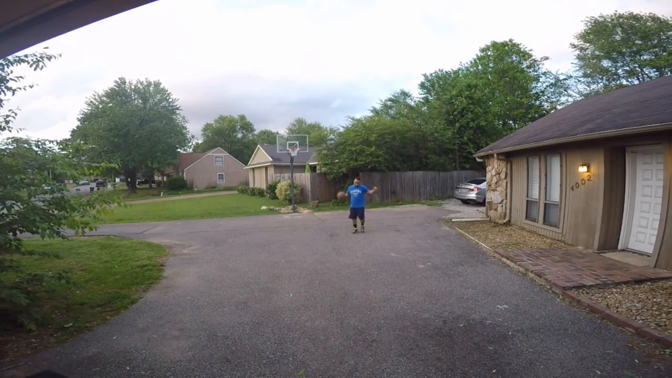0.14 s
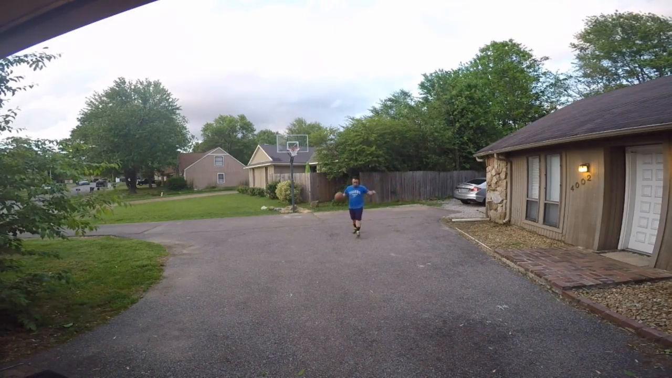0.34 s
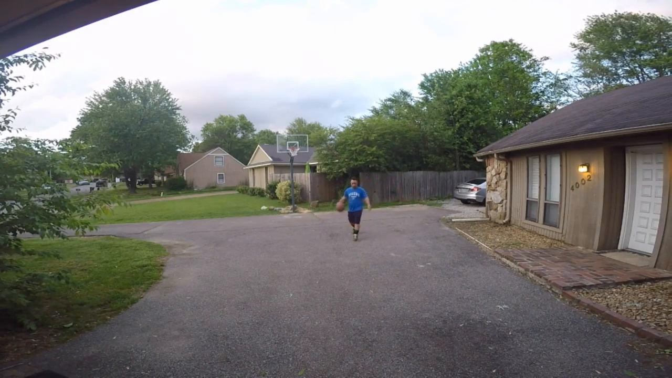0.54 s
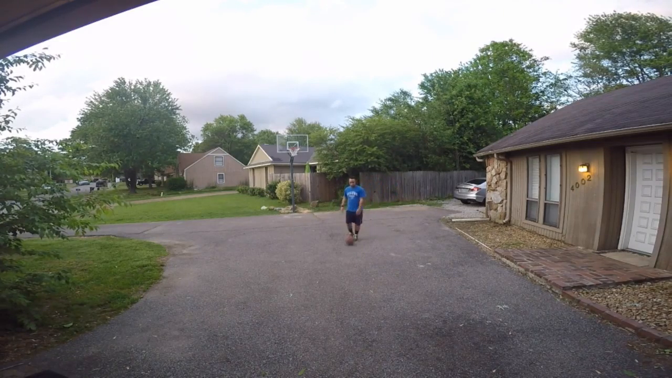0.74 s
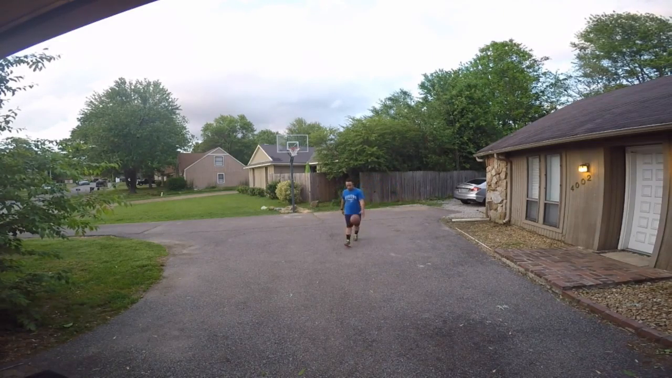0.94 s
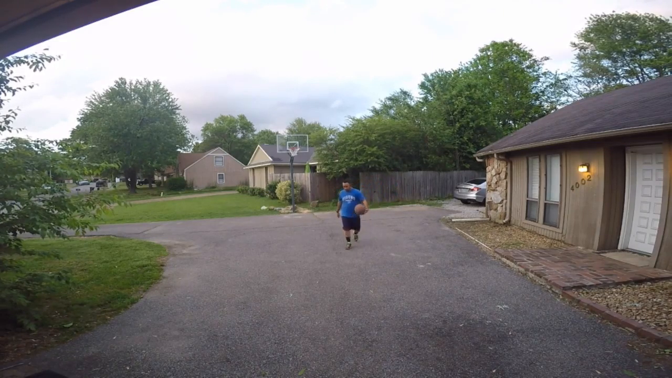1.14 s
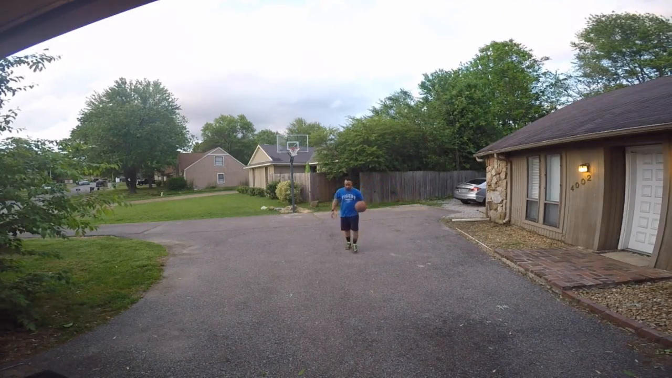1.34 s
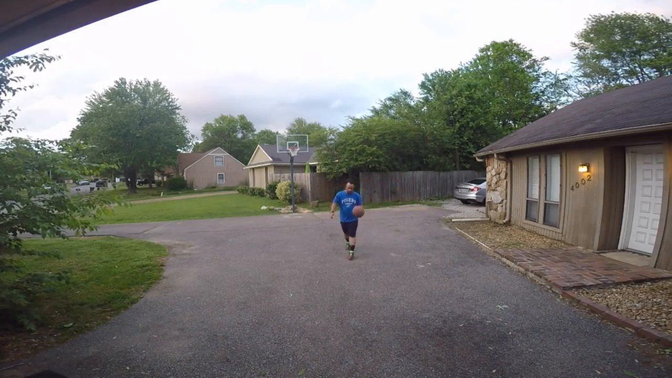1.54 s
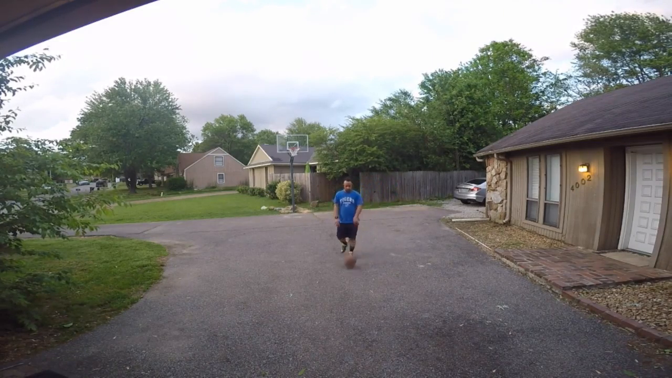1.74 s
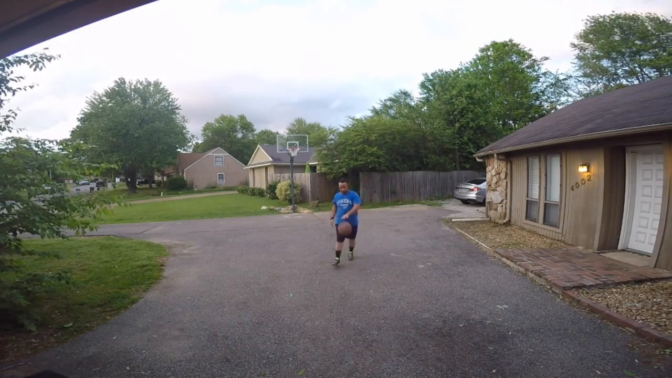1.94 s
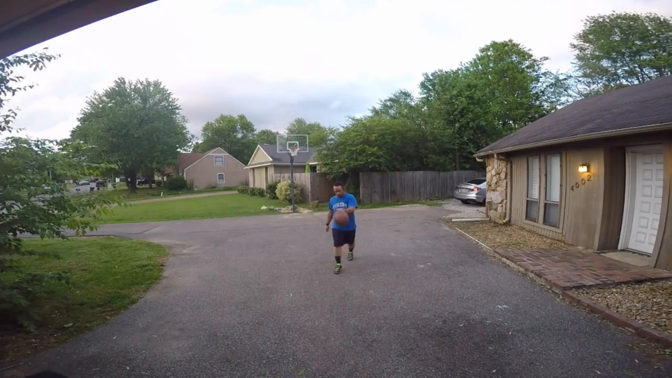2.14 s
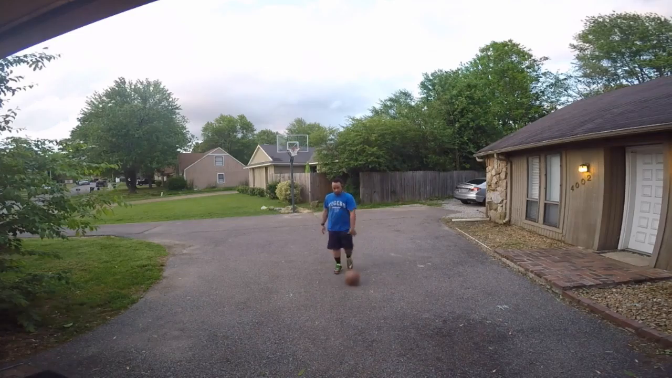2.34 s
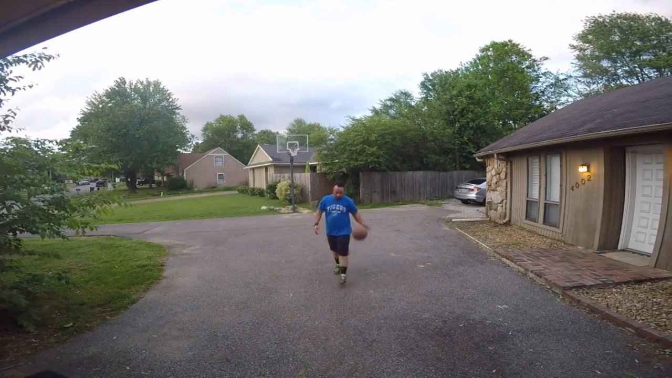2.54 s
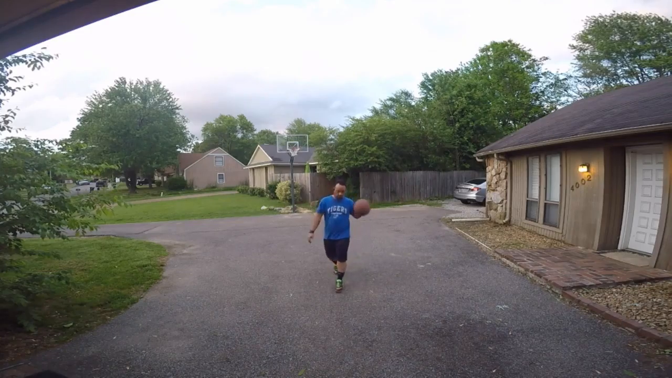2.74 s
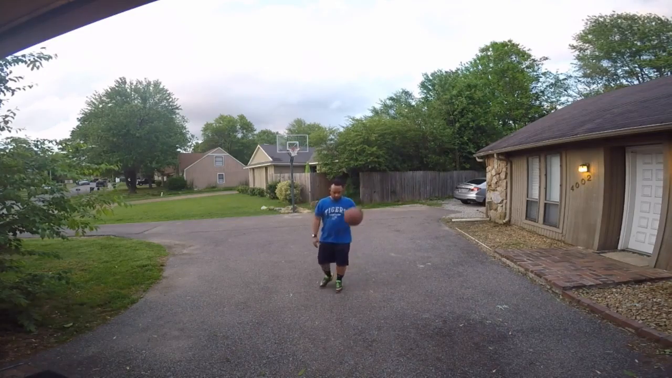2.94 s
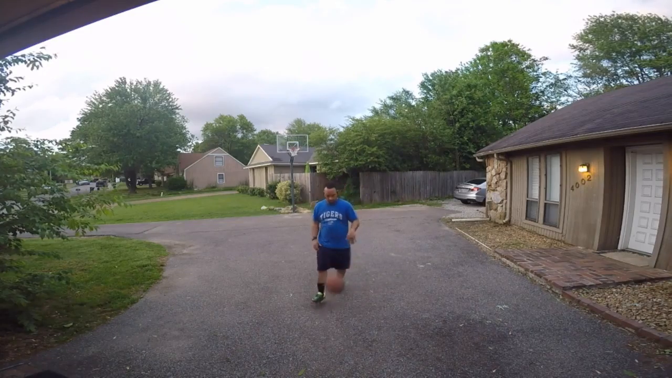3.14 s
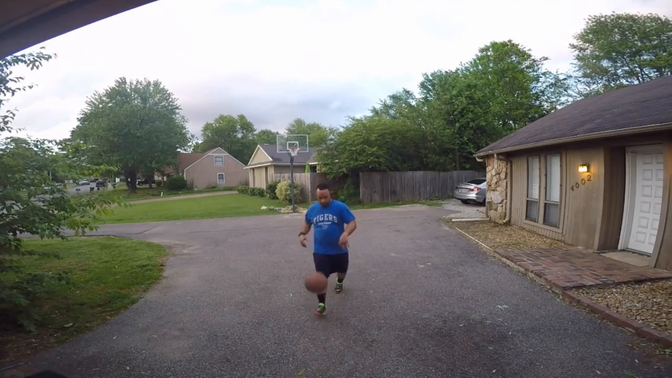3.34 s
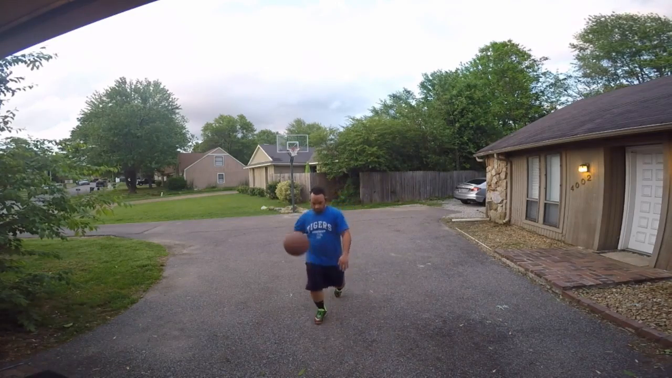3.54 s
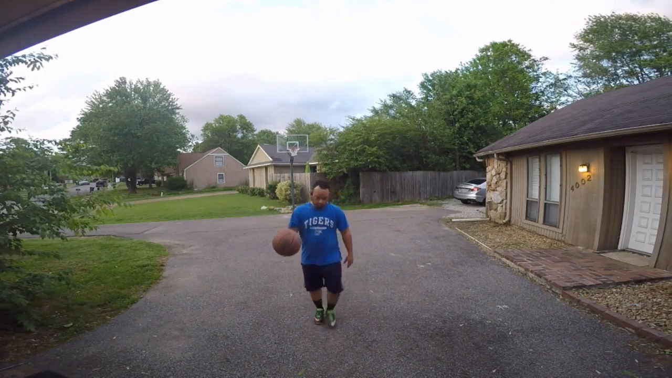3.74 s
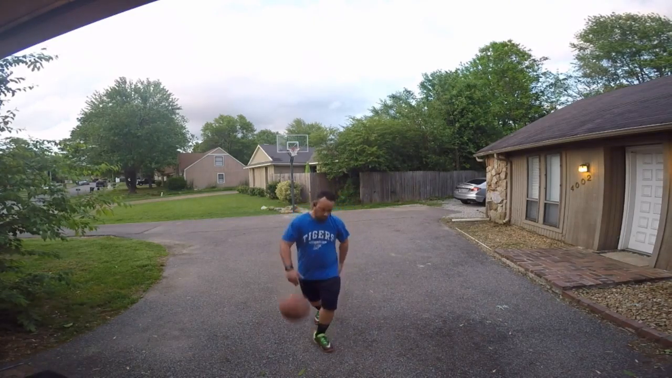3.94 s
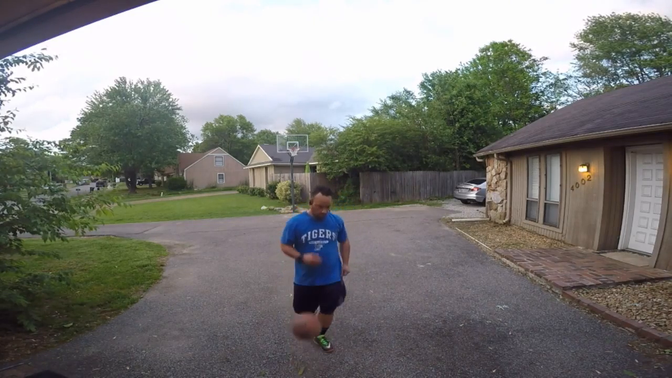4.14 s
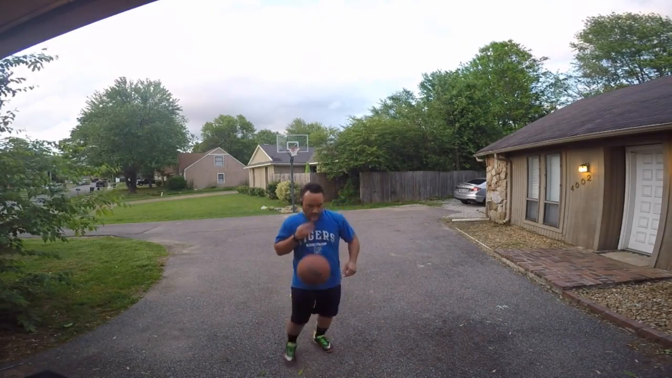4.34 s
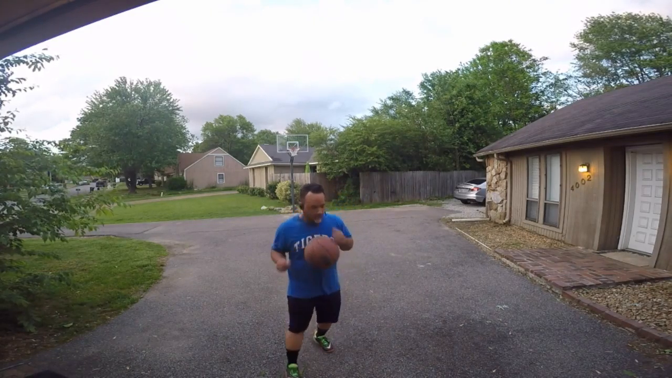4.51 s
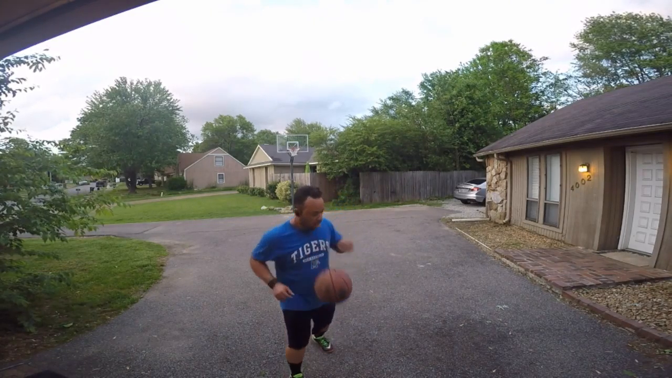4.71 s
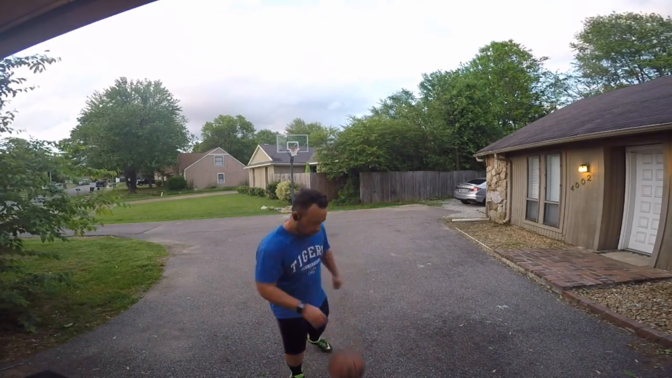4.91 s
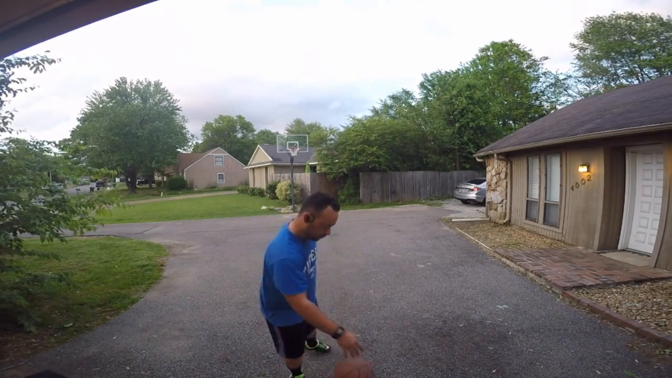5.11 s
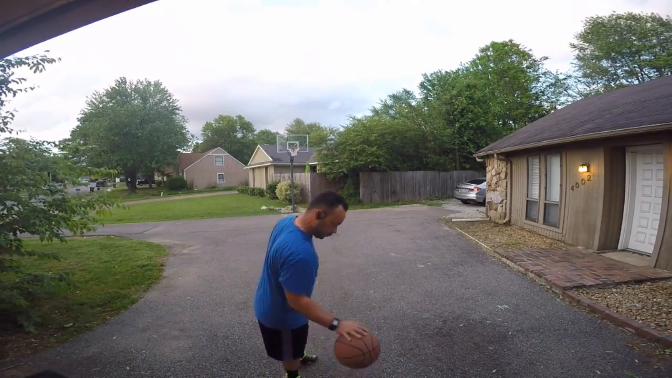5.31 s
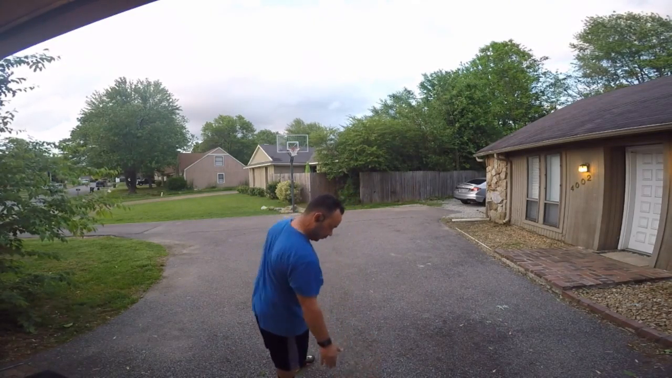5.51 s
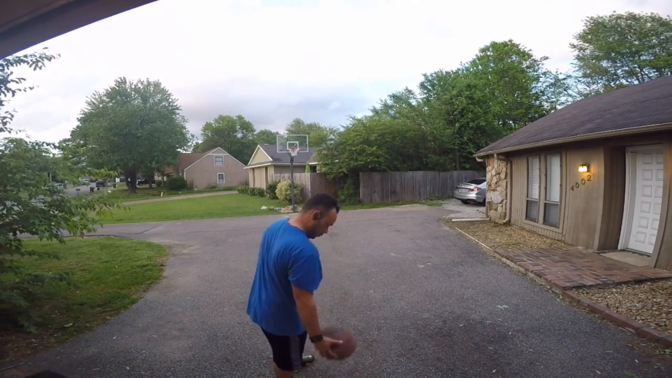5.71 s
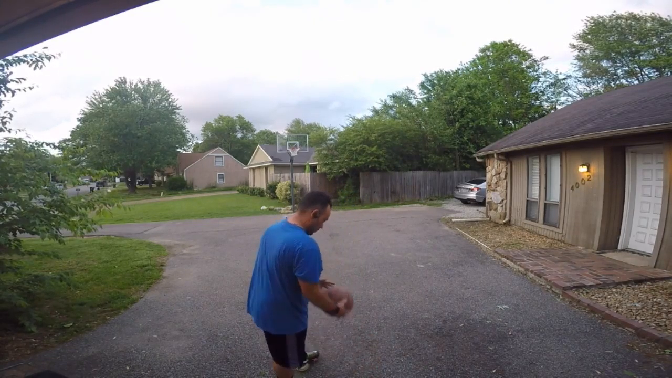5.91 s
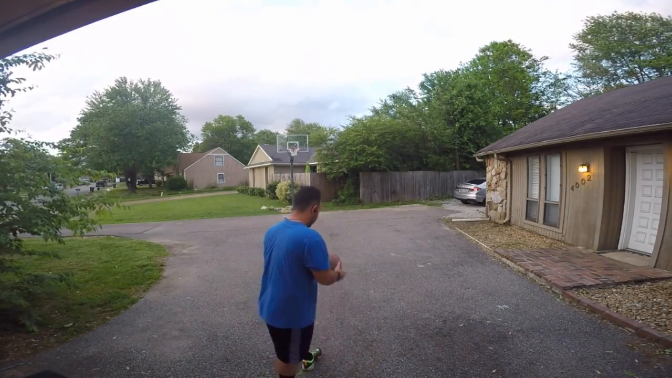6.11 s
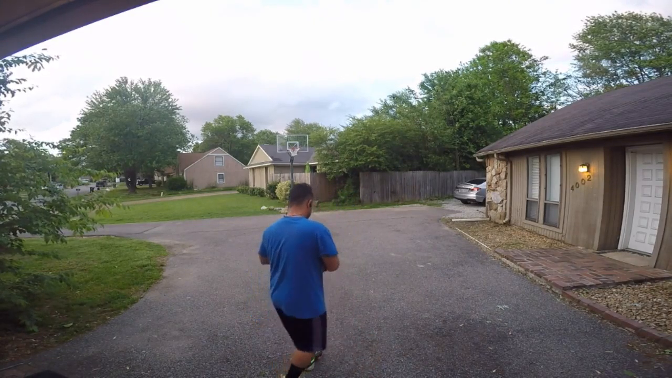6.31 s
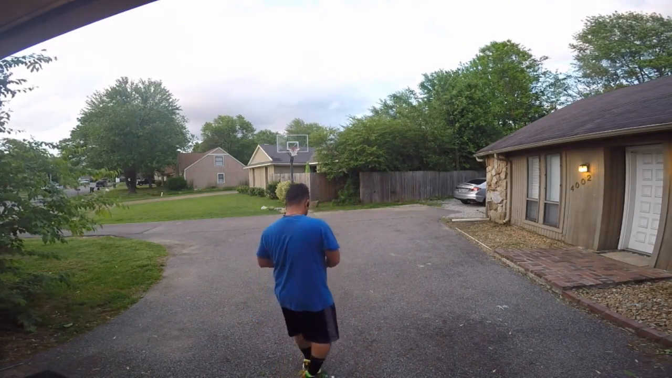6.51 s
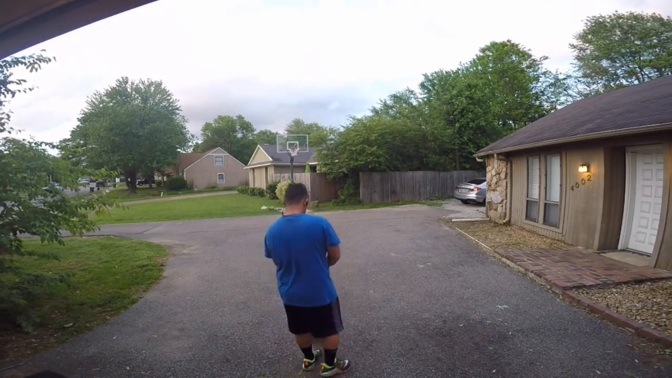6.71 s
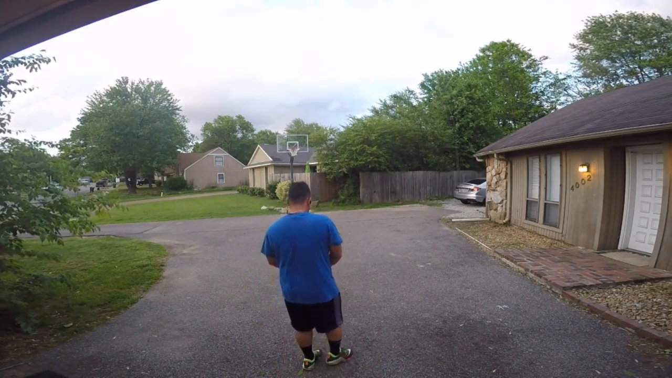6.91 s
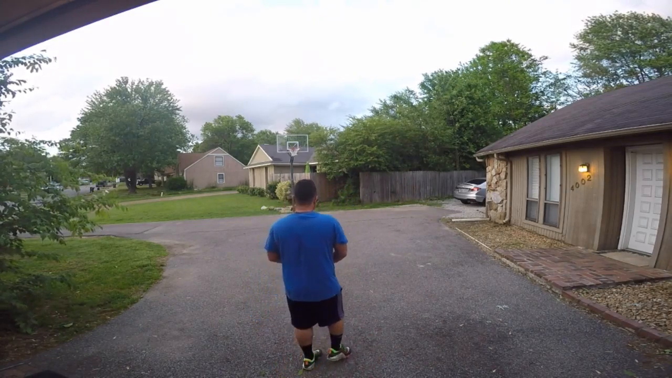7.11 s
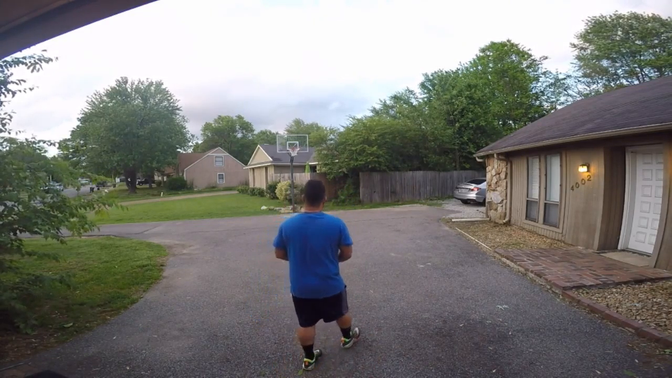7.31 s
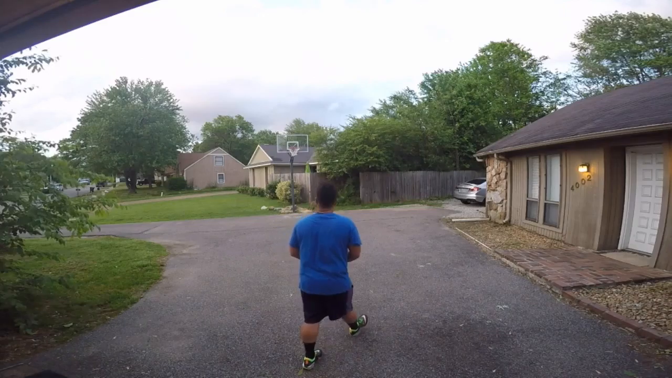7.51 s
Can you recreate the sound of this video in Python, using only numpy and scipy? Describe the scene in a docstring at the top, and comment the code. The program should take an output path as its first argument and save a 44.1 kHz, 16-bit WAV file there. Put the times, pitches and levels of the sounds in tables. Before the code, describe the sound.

Eight spaced basketball bounces on asphalt near a house, each a low thump, bright slap and faint ping, amid light footsteps and outdoor hush.

```python
"""A basketball bounces on an asphalt driveway; it comes nearer to a listener under the eaves, then backs off a little.
Each bounce is a low thump, a bright slap of the skin, a crunch of grit and a faint ping of the air inside.
Walls and yard scatter the sound, and the space under the roof booms.
Hands and shoes tap and scuff, made of short bursts and drags of gritty noise.
Behind them lie a hush of shaped noise, a far bird's gliding whistles and a faint, pulsing chirring."""
import sys
import numpy as np
from scipy import signal
from scipy.fft import rfft, irfft, next_fast_len
from scipy.io import wavfile

SR = 44100
rng = np.random.default_rng(int(sys.argv[2]) if len(sys.argv) > 2 else 0)


def wav_record(signal):
    """Record a signal, one row per channel, as 16-bit PCM in the file named by sys.argv[1]."""
    frames = np.transpose(np.atleast_2d(signal))
    bounded = np.clip(frames, -1, 1)
    # unit amplitude maps onto the largest positive 16-bit level
    quanta = np.round(bounded * 32767).astype(np.int16)
    wavfile.write(sys.argv[1], SR, quanta)


N = 337806
TIME = np.arange(N) / SR
AGE = TIME[:SR]   # one second of time since a sound began

# colour of sand and small stones, for taps and scuffs: (frequency [Hz], relative level per Hz [dB])
GRIT_COLOUR = [(200, -26), (450, -12.5), (800, -8.5), (1200, -7.5), (1380, -13.5), (1600, 5), (2200, -7),
               (2650, 0.5), (3250, -8.5), (3750, 2.5), (4100, 1), (4500, -13.5), (5500, -23), (8500, -19),
               (14000, -43)]


def from_db(db):
    """Turn decibels into a factor for the sound pressure."""
    return 10 ** (np.asarray(db) / 20)


def rms_one(x):
    """Scale a sound to an average strength (rms) of 1."""
    return x / np.sqrt(np.mean(x ** 2) + 1e-20)


def at_level(x, db):
    """Give a blow the same energy as 30 ms of steady sound at this level."""
    return x * from_db(db) * np.sqrt(0.03 * SR / (np.sum(x ** 2) + 1e-20))


def add(track, s, sound):
    """Mix a sound into the track at time s, cutting off what runs past the end."""
    start = max(round(s * SR), 0)
    track[start:start + len(sound)] += sound[:N - start]


def band(x, low_hz, high_hz, order=2):
    """Keep only the frequencies between two limits."""
    sos = signal.butter(order, [low_hz, high_hz], "band", fs=SR, output="sos")
    return signal.sosfilt(sos, x)


def coloured(x, spectrum):
    """Weight the frequencies of a sound by a spectrum, then scale it to rms 1."""
    hz, db = np.transpose(spectrum)
    size = next_fast_len(len(x))
    bins = np.maximum(np.fft.rfftfreq(size, 1 / SR), 1)
    gain = from_db(np.interp(np.log(bins), np.log(hz), db))
    return rms_one(irfft(rfft(x, size) * gain, size)[:len(x)])


def fade(t60, delay=0):
    """Start after a delay, then die away by 60 dB in t60 seconds."""
    return (AGE >= delay) * np.exp(-np.log(1000) * np.maximum(AGE - delay, 0) / t60)


def mode(hz, t60, delay=0):
    """One way a struck thing rings: a dying sine."""
    return np.sin(2 * np.pi * hz * (AGE - delay)) * fade(t60, delay)


def resonate(x, hz, width):
    """Favour the frequencies around one pitch, which itself passes at gain 1."""
    r = np.exp(-np.pi * width / SR)
    feed = np.array([1, 0, -1]) * (1 - r * r) / 2
    feedback = [1, -2 * r * np.cos(2 * np.pi * hz / SR), r * r]
    return signal.lfilter(feed, feedback, x + 1e-18)


def flicker(per_s, db, size):
    """A gain that glides between random values, so many of them a second."""
    return from_db(db * np.interp(TIME[:size] * per_s, np.arange(SR), rng.standard_normal(SR)))


def near_walls(t60):
    """Echo pattern of the eaves and house front: separate reflections, dying fast; energy 1."""
    hits = rng.random(SR) < 2500 / SR   # about 2500 reflections a second
    echoes = rng.standard_normal(SR) * hits * fade(t60, delay=0.0056)
    return echoes / np.linalg.norm(echoes)


def yard(fence_s=0.07, fence_share=0.29, lumps_per_s=70, lumps_db=2):
    """Echo pattern of trees, houses and the far fence: a lumpy tail plus one soft echo."""
    # how long the yard rings: (frequency [Hz], time to fall by 60 dB [s])
    ring_times = [(100, 1), (300, 0.66), (900, 0.87), (1700, 0.84), (3500, 0.7), (6000, 1), (12000, 0.45)]
    hz, t60 = np.transpose(ring_times)
    edges = np.geomspace(80, 16000, 8)
    tail = np.zeros(SR)
    for low, high in zip(edges, edges[1:]):
        band_t60 = np.interp(np.log(low * high) / 2, np.log(hz), t60)
        tail += band(rng.standard_normal(SR), low, high) * fade(band_t60, delay=0.012)
    tail = tail * flicker(lumps_per_s, lumps_db, size=SR)
    fence = rng.standard_normal(SR) * fade(t60=0.13, delay=fence_s)
    tail_part = np.sqrt(1 - fence_share) * tail / np.linalg.norm(tail)
    return tail_part + np.sqrt(fence_share) * fence / np.linalg.norm(fence)


def reflections(sound, near_db, yard_db):
    """What the near walls and the yard send back, each with its own share."""
    response = from_db(near_db) * near_walls(t60=0.12) + from_db(yard_db) * yard()
    return signal.fftconvolve(sound, response)[:len(sound)]


def outdoors(sound, near_db, yard_db):
    """A direct sound together with its reflections."""
    return sound + reflections(sound, near_db, yard_db)


def hush():
    """Steady noise shaped like distant trees, traffic and hiss, with narrow, faint whines."""
    # colour of the hush: (frequency [Hz], relative level per Hz [dB])
    hush_colour = [(10, -92.5), (30, -76), (60, -78.5), (100, -87), (220, -94.5), (650, -102), (1330, -105),
                   (1600, -98), (1950, -103), (4300, -104), (6300, -108.5), (7500, -112), (14300, -114),
                   (15300, -120)]
    # whines in the hiss: (frequency [Hz], width [Hz], level [dB])
    whine_bands = [(4740, 110, -90.5), (9530, 220, -84.5), (14100, 300, -94)]
    out = from_db(-58) * coloured(rng.standard_normal(N), hush_colour)
    for hz, width, db in whine_bands:
        out += from_db(db) * rms_one(resonate(rng.standard_normal(N), hz, width))
    return out


def chirring():
    """Insect-like chirps, loosely spaced: two bands of noise switched by a few quick pulses."""
    # bouts of chirring: (start [s], end [s])
    bouts = [(0, 0.6), (2.53, 6.25)]
    # bands of the noise: (frequency [Hz], width [Hz], level before the pulses shape it [dB])
    noise_bands = [(6280, 850, -70), (12800, 490, -73)]
    chirps_per_s, chirp_s, pulses_per_s = 6.9, 0.05, 75   # chirp_s is the average length
    chirps = np.zeros(N)
    for start, end in bouts:
        for s in np.arange(start, end, 1 / chirps_per_s):
            length = chirp_s * rng.uniform(0.5, 1.5)
            pulses = (AGE < length) * np.sin(np.pi * pulses_per_s * AGE) ** 2
            add(chirps, s + rng.random() * chirp_s, pulses)
    noise = np.zeros(N)
    for hz, width, db in noise_bands:
        noise += from_db(db) * rms_one(band(rng.standard_normal(N), hz - width / 2, hz + width / 2))
    return chirps * noise


def bird():
    """Thin gliding whistles that swell and fade, heard only through their reflections."""
    # notes: (time [s], length [s], start pitch [Hz], end pitch [Hz], peak level before reflection [dB])
    notes = [(2.92, 0.082, 3740, 4000, -70), (4.5, 0.14, 5210, 5500, -76), (4.61, .09, 5400, 5200, -78),
             (4.842, 0.072, 5450, 5120, -72)]
    out = np.zeros(N)
    for s, length, start_hz, end_hz, db in notes:
        progress = np.minimum(AGE / length, 1)
        phase = 2 * np.pi * np.cumsum(start_hz + (end_hz - start_hz) * progress) / SR
        add(out, s, from_db(db) * np.sin(np.pi * progress) * np.sin(phase))
    return reflections(out, near_db=-1, yard_db=-8)


def drag(length_s):
    """Pressure of one drag: the sole bites, eases off as it slides, then lifts."""
    attack_s, sag_db_per_s, release_t60 = 0.0067, 32, 0.17
    lift = np.exp(-np.log(1000) * np.maximum(AGE - length_s, 0) / release_t60)
    return np.minimum(AGE / attack_s, 1) * from_db(-sag_db_per_s * AGE) * lift


def scuffs(grains_per_s):
    """A dragged sole rolls over many small stones: most tick softly, a few loudly."""
    # soles dragging on grit: (time [s], length before the lift [s], level before easing off [dB])
    drags = [(0.526, 0.054, -65), (4.837, .06, -63.5), (5.359, 0.099, -45.5), (6.48, 0.028, -59),
             (6.507, 0.046, -48), (6.609, 0.083, -58)]
    pressure = np.zeros(N)
    for s, length_s, db in drags:
        add(pressure, s, from_db(db) * drag(length_s))
    stones = (rng.random(N) < grains_per_s / SR) * rng.laplace(size=N)
    slips = flicker(per_s=100, db=1.2, size=N)   # the sole catches and slips as it drags
    return pressure * slips * coloured(stones, GRIT_COLOUR)


def soft_steps():
    """Faint footfalls at a loose walking pace, as rows like those of the taps."""
    step_s, jitter_s = 0.55, 0.097
    level_db, centre_hz, t60 = -55.5, 2190, 0.079
    paces = np.arange(step_s, TIME[-1] - step_s, step_s)
    return [(s + rng.normal(0, jitter_s), level_db, centre_hz, t60) for s in paces]


def taps(relative_width, rise_share):
    """Palms and shoes: short gritty bursts around a centre pitch; longer ones also start softer."""
    # hands on the ball and shoes on the ground:
    # (time [s], level before rise and fade [dB], centre frequency [Hz], time to fall by 60 dB [s])
    touches = [(0.017, -43, 2430, 0.02), (0.2609, -37.5, 2080, 0.03), (0.278, -42.5, 2170, 0.037),
               (1.626, -46.5, 1990, 0.054), (2.0123, -48, 2280, 0.037), (2.6256, -48, 1590, 0.044),
               (2.7247, -49, 2860, 0.038), (3.605, -44.5, 2430, 0.057), (6.003, -50.5, 333, 0.041),
               (6.1709, -43.5, 1440, 0.027), (6.468, -50, 1690, 0.043), (6.995, -42, 2460, 0.048),
               (7.019, -50, 1790, 0.07)]
    out = np.zeros(N)
    for s, db, hz, t60 in touches + soft_steps():
        grain = coloured(rng.standard_normal(SR), GRIT_COLOUR)
        width = relative_width * hz
        centre = rms_one(resonate(resonate(grain, hz, width), hz, width))
        rise = 1 - fade(rise_share * t60)
        add(out, s, from_db(db) * centre * fade(t60) * rise)
    return out


def boom(boom_db, arrives_s=0.0276):
    """The space under the roof swells into its lowest resonance and hums on."""
    hum = mode(hz=63.9, t60=0.72, delay=arrives_s) * (1 - fade(t60=0.085, delay=arrives_s))
    return at_level(hum, boom_db + 9.0)


def pulse(hz, at_s):
    """One smooth push of air with a dip on either side."""
    u = (np.pi * hz * (AGE - at_s)) ** 2
    return (1 - 2 * u) * np.exp(-u)


def thump(thump_db, heave_db):
    """The ball squashes and springs back with opposite pulses; the shell flexes over a slow heave of air."""
    squash = pulse(hz=182.5, at_s=0.00514)
    spring_back = 0.5 * pulse(hz=155, at_s=0.01034)
    flex = squash - spring_back - 0.42 * mode(hz=254, t60=0.022, delay=0.0012)
    heave = mode(hz=73.4, t60=0.29, delay=0.0008) * (1 - fade(t60=0.037))
    return at_level(flex, thump_db + 0.5) + at_level(heave, heave_db + 5.0)


def ping():
    """The enclosed air rings on faintly, a little differently at each bounce."""
    # modes of the air inside: (frequency [Hz], level before the bounce's own change [dB], 60 dB fall [s])
    air_modes = [(940, -68, .3), (1590, -60, .55), (2525, -64, .45), (2842, -52.5, .8), (3225, -63, .5),
                 (3483, -62, .5), (4037, -61, .5)]
    return sum(from_db(db + rng.normal(0, 1.0)) * mode(hz, t60) for hz, db, t60 in air_modes)


def contact(t60, hold_s):
    """Envelope of a blow: it rises at once, holds while the skin flattens, then dies."""
    rise = 1 - np.exp(-(AGE / 0.00032) ** 2)
    return rise * np.exp(-np.log(1000) * np.maximum(AGE - hold_s, 0) / t60)


def slap(knock_db, slap_db, spot_hz, spot_db, grit_db, grit_hz, detune):
    """The contact rings the skin and crunches grit; the spot that lands favours modes near one pitch."""
    # edges of the skin's six zones: (frequency [Hz])
    zone_edges = [400, 870, 1400, 1800, 2200, 3050, 4400]
    # usual level of each zone, the lowest two for the knock, the rest for the slap: (level [dB])
    zone_levels = [-46.5, -43, -37, -41.5, -36, -35]
    # modes of the ball's skin: (frequency [Hz], relative level within its zone [dB], 60 dB fall [s])
    skin_modes = [(474, -9, 0.061), (652, -10, 0.043), (814, -8.5, 0.049), (934, -9, 0.077),
                  (1119, -3.5, 0.035), (1229, -4, 0.13), (1280, -12.5, 0.12), (1582, -7, 0.0227),
                  (1717, -7.5, 0.019), (1889, 10, 0.019), (2175, 5, 0.0057), (2226, 2.5, 0.013),
                  (2502, 5.5, 0.024), (2684, 6.5, 0.011), (2816, 2, 0.024), (3228, 2, 0.022),
                  (3420, -3.5, 0.024), (3742, 5.5, 0.02), (3968, 4.5, 0.017), (4210, -10.5, 0.009)]
    # colour of grit crunching under the ball: (frequency [Hz], relative level per Hz [dB])
    crunch_colour = [(4400, 11), (5500, 2), (6800, -1), (8400, -1), (9300, -9.5), (14000, -8)]
    skin = np.zeros(SR)
    for k, (low, high, usual_db) in enumerate(zip(zone_edges, zone_edges[1:], zone_levels)):
        zone = np.zeros(SR)
        for hz, db, t60 in skin_modes:
            if low <= hz < high:
                # modes that die fast shift most as the ball deforms
                pitch = hz + rng.normal(0, detune / t60)
                tone = np.sin(2 * np.pi * (pitch * AGE + rng.random()))
                zone += from_db(db + rng.normal(0, 0.95)) * tone * contact(t60, hold_s=0.005)
        change_db = knock_db if k < 2 else slap_db
        skin += at_level(zone, usual_db + change_db)
    spot = (from_db(spot_db) - 1) * resonate(skin, spot_hz, width=350)
    # grit crunches above the skin's zones
    noise = coloured(rng.standard_normal(SR), crunch_colour)
    crunch = band(noise, zone_edges[-1], 12000, order=3) * contact(t60=0.031, hold_s=0.0017)
    return skin + spot + at_level(resonate(crunch, grit_hz, width=2600), grit_db)


def follow(law, thump_db, distance_m):
    """Level of one part of a bounce, from the force of the blow and its distance."""
    usual_db, share, db_per_doubling = law
    usual_distance_m, usual_thump_db = 5, -37
    force_db = share * (thump_db - usual_thump_db)
    return usual_db + force_db + db_per_doubling * np.log2(distance_m / usual_distance_m)


def dribble(count=2):
    """All bounces on the asphalt: at equal force, near ones heave and ping more, far ones boom more."""
    # bounces, with levels before the offsets of the parts and the overall gain below:
    # (time [s], distance [m], thump level [dB], hollow knock above usual [dB], bright slap above usual [dB],
    #  pitch the landing spot favours [Hz], its boost [dB], grit level [dB], grit pitch [Hz],
    #  near-wall share [dB])
    bounces = [(0.8245, 12, -38.5, -2, -4, 2140, 6, -52, 4670, -8),
               (1.8295, 20, -34, -0.5, -3, 2070, 11.2, -50, 6700, -8),
               (2.4211, 9.8, -32.5, -1, 1, 1670, 12.4, -56, 7500, -10.5),
               (3.2899, 6, -34, 0.5, -0.5, 1900, 10.6, -46.5, 5800, -9.5),
               (4.1206, 3.8, -35, 2, 3, 1620, 7.6, -45, 5400, -10),
               (5.0646, 3.1, -38.5, 0.5, 3.5, 2870, 5.1, -44.5, 4700, -6.5),
               (5.571, 3.7, -41.5, 0.5, 0, 1800, 2.8, -51.5, 6000, -5.5),
               (6.802, 6.1, -38, 4, -0.5, 2780, 4.5, -46.5, 8300, -0.5)]
    # how each part follows the bounce, before its own offset:
    # (usual level [dB], share of the thump's change [dB per dB], change per doubling of distance [dB])
    heave_law = (-40.5, 0.178, -5.5)
    boom_law = (-48.5, 0.59, 2.1)
    ping_law = (-1.6, 0.27, -5)
    out = np.zeros(N)
    for (s, distance_m, thump_db, knock_db, slap_db, spot_hz, spot_db,
         grit_db, grit_hz, near_db) in bounces:
        heave_db = follow(heave_law, thump_db, distance_m)
        boom_db = follow(boom_law, thump_db, distance_m)
        ping_db = follow(ping_law, thump_db, distance_m)
        blow = (knock_db, slap_db, spot_hz, spot_db, grit_db, grit_hz)
        yard_db = -16 + 0.5 * near_db   # the yard's share follows the near walls' share halfway
        direct = slap(*blow, detune=0.75) + from_db(ping_db) * ping()
        # the skin radiates differently toward each wall, so the reflections blur its modes
        scattered = np.zeros(SR)
        for _ in range(count):
            scattered += reflections(slap(*blow, detune=2.05), near_db, yard_db) / np.sqrt(count)
        low = outdoors(thump(thump_db, heave_db), near_db=-5.5, yard_db=-16)
        add(out, s, direct + scattered + low + boom(boom_db))
    return from_db(-1.68) * out


def scene():
    """Background, player and ball together."""
    background = hush() + chirring() + bird()
    player = taps(relative_width=0.78, rise_share=0.36) + scuffs(grains_per_s=3600)
    return (background + outdoors(player, near_db=-8, yard_db=-23) + dribble())[None]


def record(dry):
    """Cut the top of the sound steeply above 15.3 kHz."""
    sos = signal.ellip(14, 0.1, 80, 15300, fs=SR, output="sos")
    return signal.sosfilt(sos, dry)


dry = scene()
out = record(dry)
wav_record(out)
```